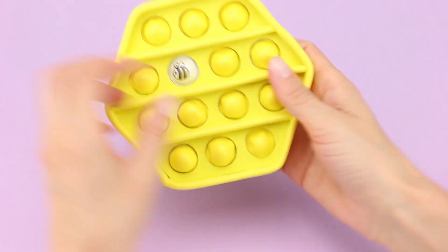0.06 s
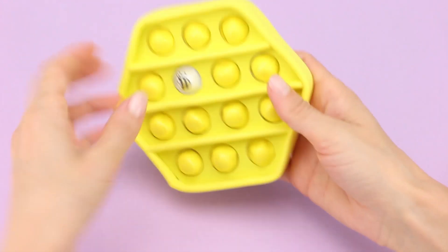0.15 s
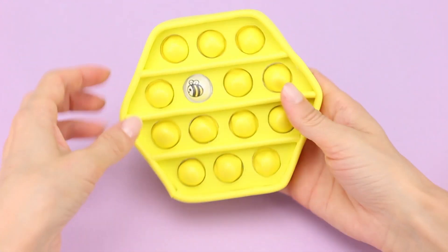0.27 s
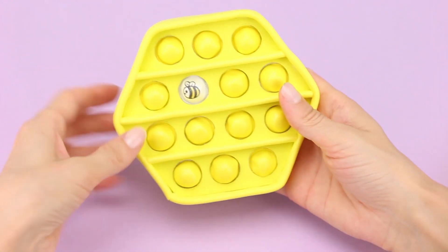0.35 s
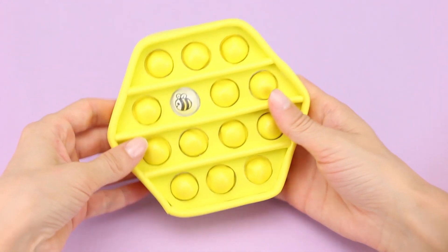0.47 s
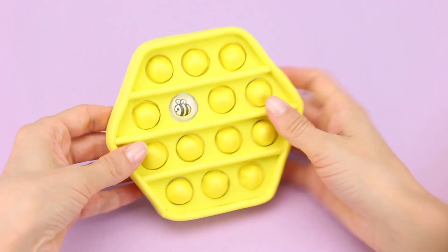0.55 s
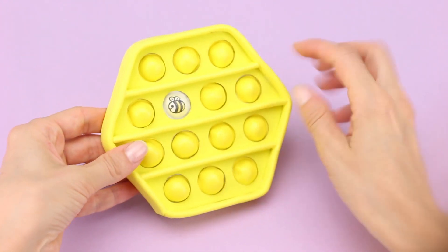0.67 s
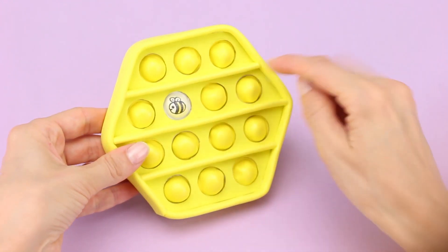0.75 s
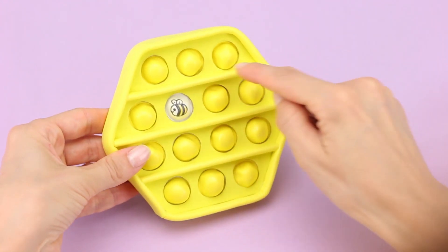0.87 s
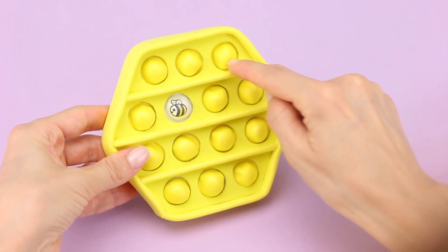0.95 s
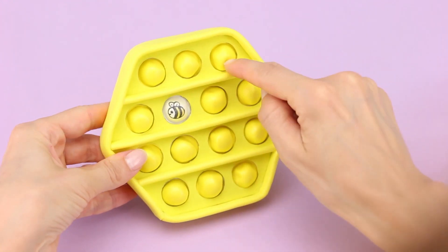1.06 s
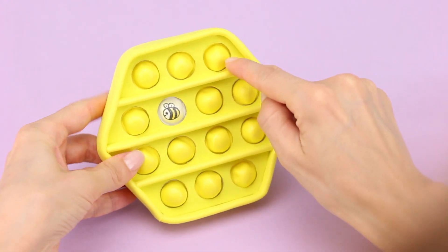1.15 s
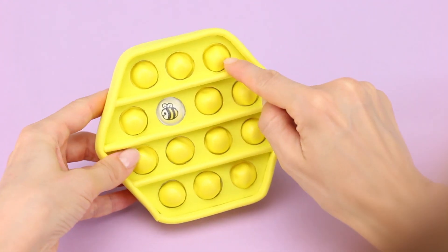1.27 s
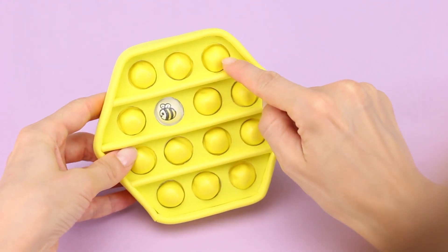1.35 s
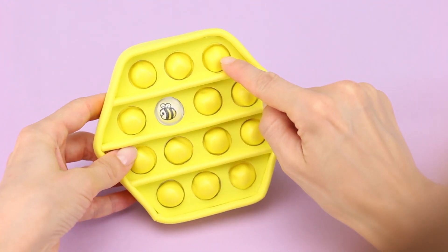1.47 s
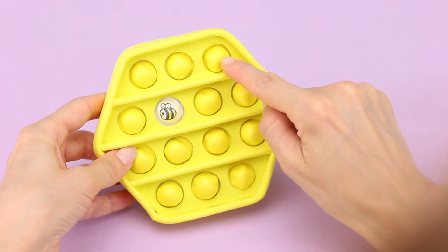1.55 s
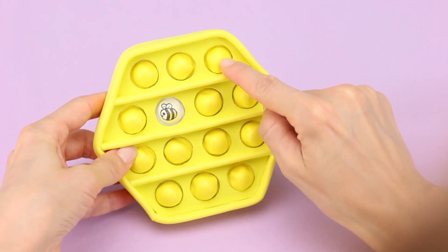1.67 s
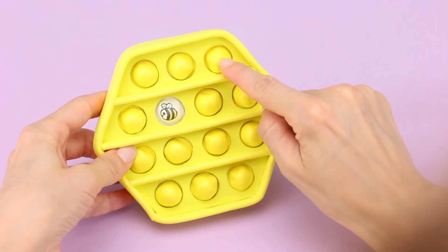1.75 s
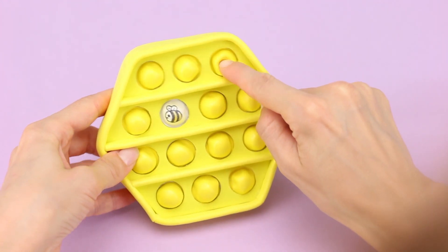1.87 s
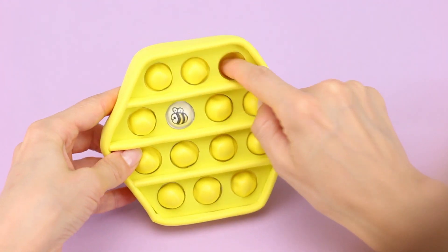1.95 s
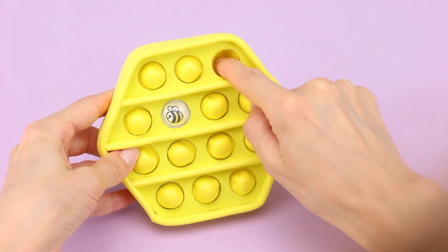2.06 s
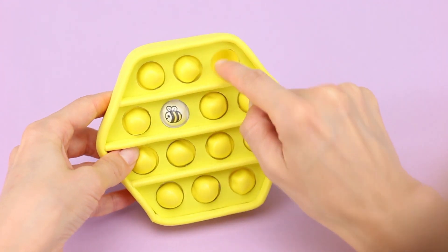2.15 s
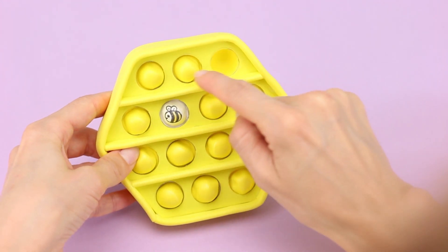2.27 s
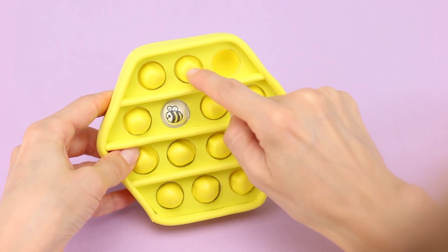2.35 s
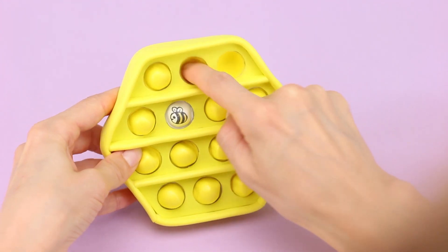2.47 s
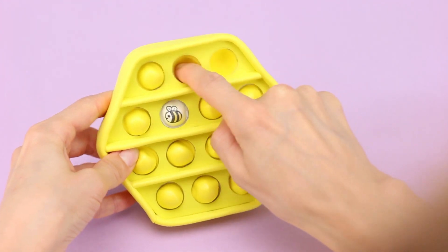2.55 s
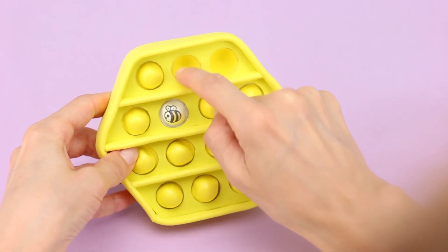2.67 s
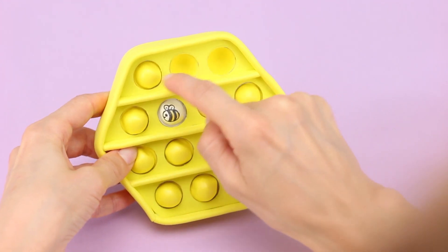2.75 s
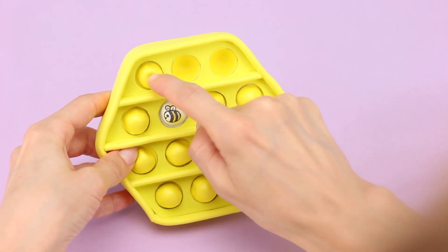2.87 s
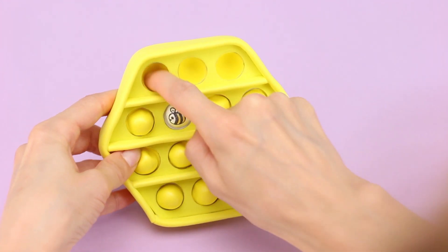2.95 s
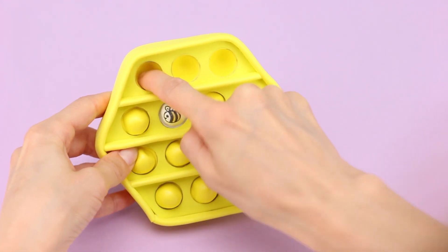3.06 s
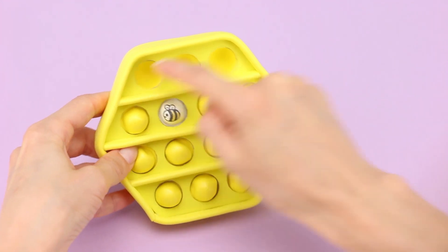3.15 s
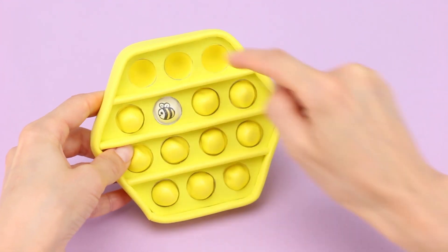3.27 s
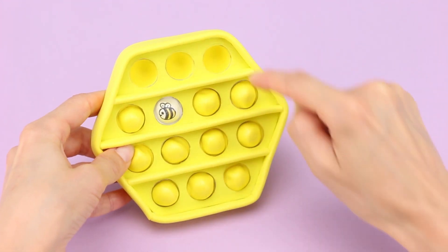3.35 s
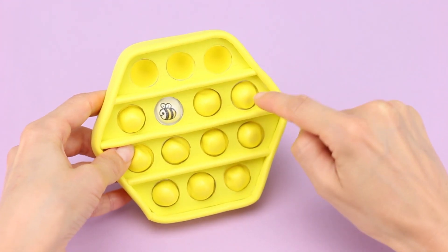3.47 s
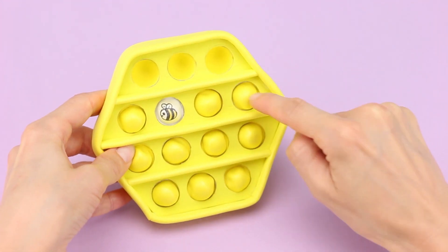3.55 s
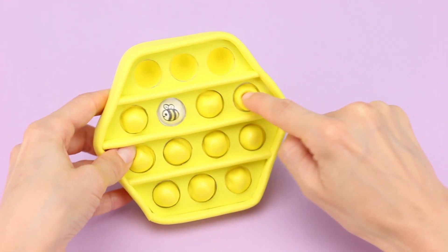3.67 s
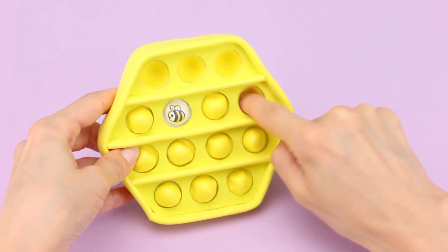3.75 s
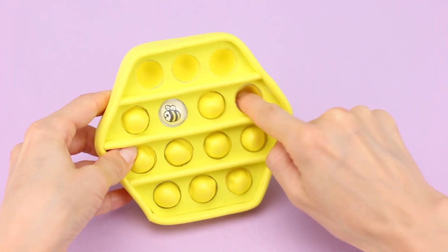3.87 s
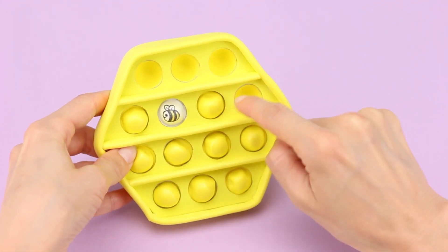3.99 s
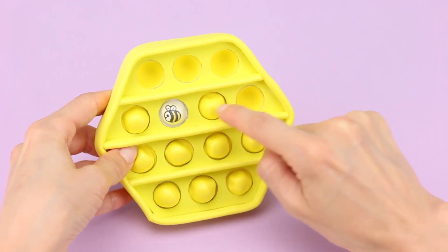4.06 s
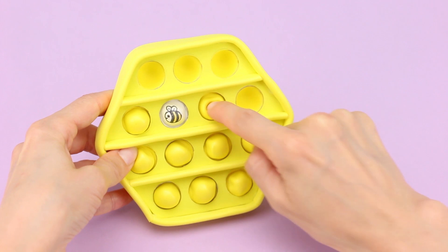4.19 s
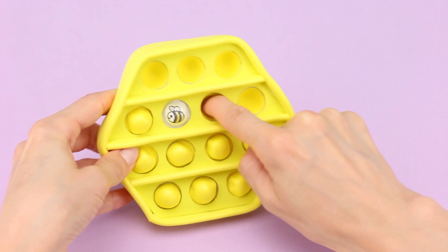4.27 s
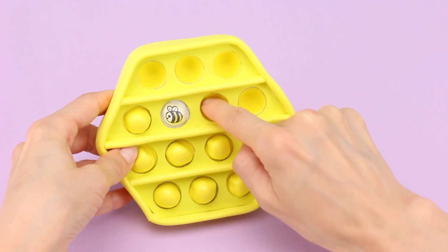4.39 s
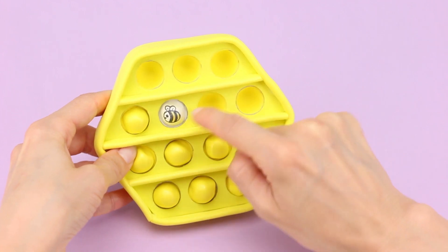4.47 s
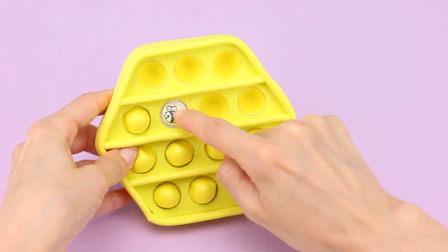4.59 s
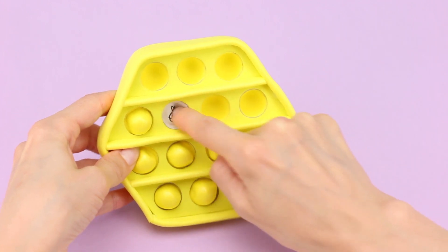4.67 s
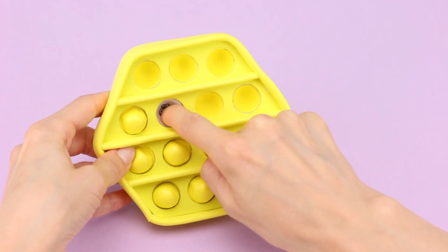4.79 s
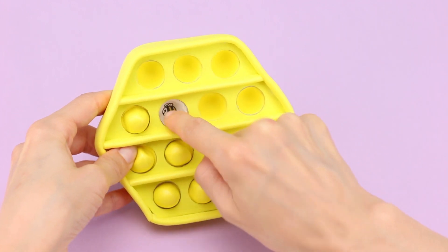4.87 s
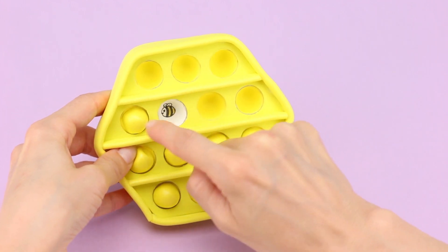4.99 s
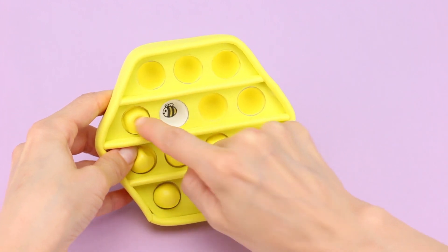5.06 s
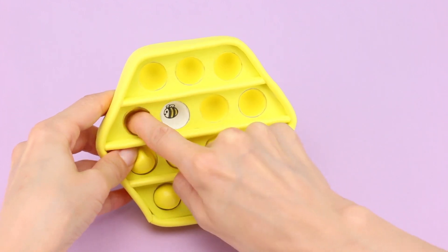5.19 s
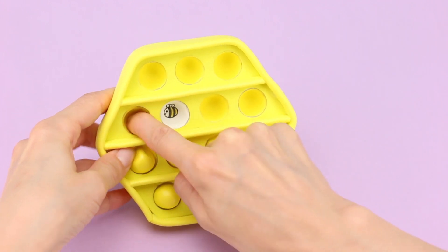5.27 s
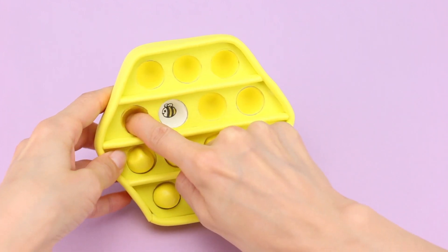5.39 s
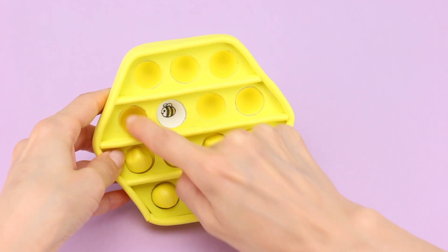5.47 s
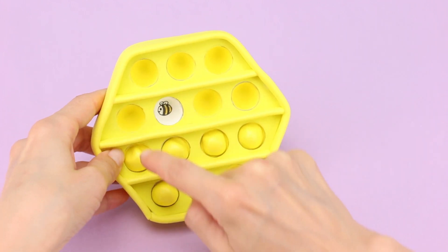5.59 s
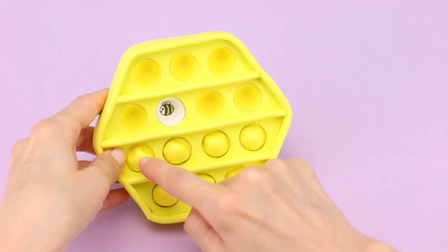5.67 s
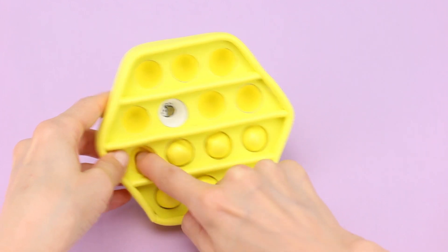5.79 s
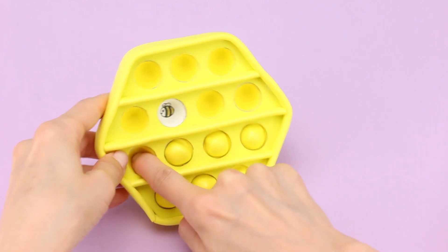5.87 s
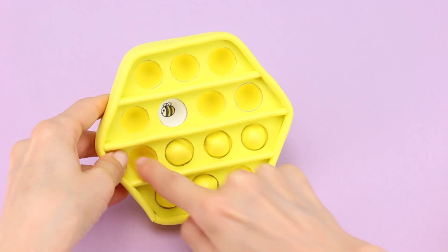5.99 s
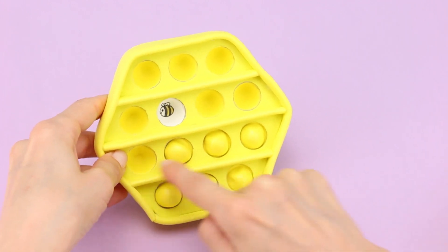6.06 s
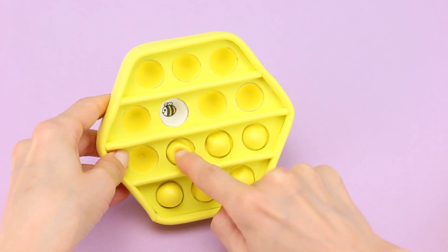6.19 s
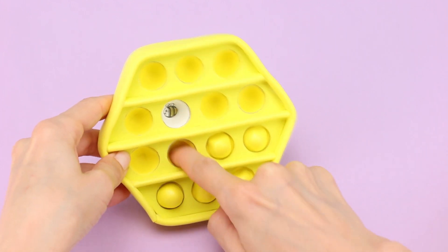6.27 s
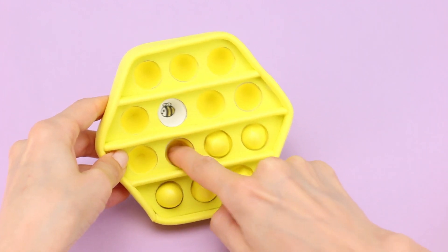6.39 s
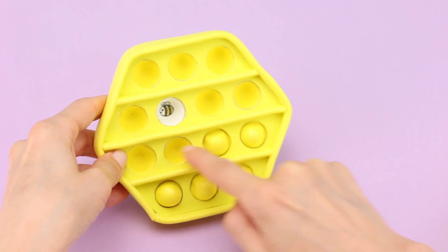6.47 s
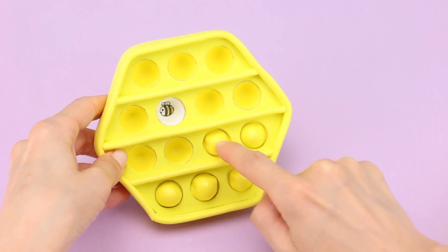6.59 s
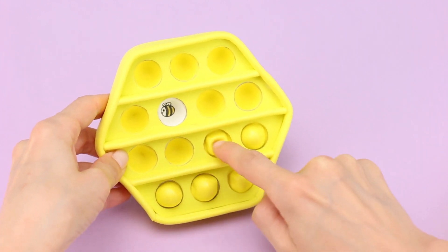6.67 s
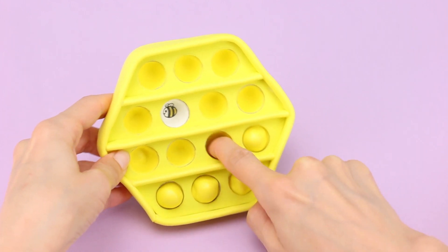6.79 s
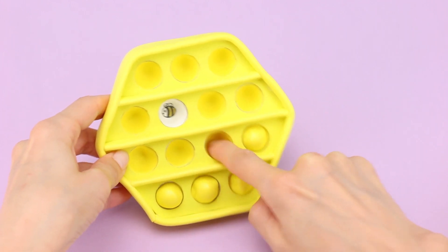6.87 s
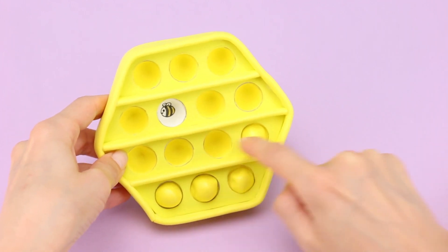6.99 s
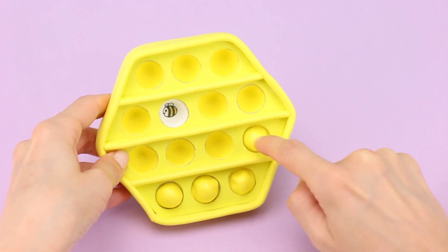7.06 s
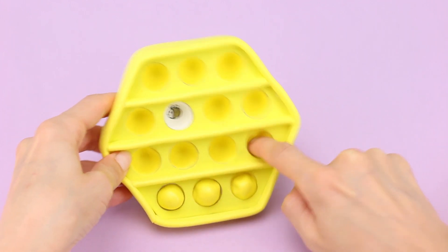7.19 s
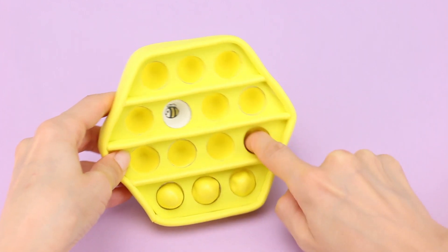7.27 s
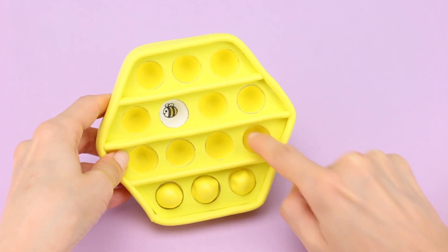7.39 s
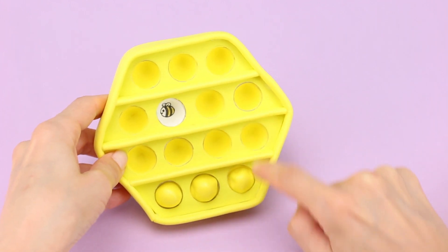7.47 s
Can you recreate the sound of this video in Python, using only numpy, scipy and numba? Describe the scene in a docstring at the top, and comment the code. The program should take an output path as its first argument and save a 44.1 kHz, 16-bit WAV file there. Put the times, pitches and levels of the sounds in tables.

```python
"""Fingertips first tap and rub softly on rubber over a faint hiss; from about two seconds, ten loud pops follow.
Fingers press the bubbles of a silicone pop toy, close to a stereo microphone in a small, bare room.
Each dome crumples, snaps through and rings the air in its cup; one stiff dome only crunches.
Taps, rubs and lifting fingers are noise shaped by resonances; the room adds reflections and a fading tail.
The loud pops overdrive the recorder: it clips their first cycles and its limiter ducks the start of the echo."""
import sys
import numpy as np
from scipy import signal
from scipy.fft import rfft, irfft, next_fast_len
from scipy.io import wavfile
from scipy.ndimage import map_coordinates
from numba import njit

SR = 44100
rng = np.random.default_rng(int(sys.argv[2]) if len(sys.argv) > 2 else 0)


def unload_wav(signal):
    """Save mono or channel-first audio to the path in sys.argv[1] as 16-bit WAV at rate SR, clipped to [-1, 1]."""
    wavfile.write(
        sys.argv[1],
        SR,
        np.round(np.clip(np.atleast_2d(signal).T, -1, 1) * 32767).astype(np.int16),
    )


N = 332073  # length of the scene in samples

# rings of the empty cups and of the whole sheet of rubber
CUPS_HZ, CUPS_WIDTH_HZ, SHEET_HZ, SHEET_WIDTH_HZ = 1437, 360, 154.5, 76

# one press per dome; the peak is that of the direct sound, before the room and the left-right balance:
# (time [s], peak [dB], cup pitch [Hz], dome pitch [Hz], dome against cup [dB], slap against cup [dB],
#  thump against cup [dB], snap speed as cut-off [Hz], hollowness [0-1], puff peak [dB], time until the lift [s])
DOME_POPS = [(2.0335, 7, 1220, 2394, 0, -26, -7.5, 5800, 0.4, -26, 0.15),
             (2.544, 10, 1420, 1960, -4.5, -22.5, -12, 5300, 0.03, -47.5, .167),
             (3.0317, 2.5, 1150, 1860, -6, -13, -3.5, 4720, .2, -50.5, .165),
             (3.8342, -7.5, 920, 2670, -41, -43, 3, 4000, 0.4, -46, .153),
             (4.3343, 8.5, 1484, 2450, -18.5, -16, -37, 3140, 0.2, -18.5, .145),
             (5.2246, 10, 1360, 2230, -15, -14.5, -51, 4500, 0.63, -7, .32),
             (5.892, -0.5, 1220, 2950, -30, -51, -40, 7220, 0.44, -57, .185),
             (6.3501, 8, 1520, 2740, -47, -8.5, -35, 3800, 0.3, -7.5, .153),
             (6.831, 13, 1584, 2555, -16, -34.5, -36, 7600, 0.84, -44, .174),
             (7.295, 8, 1483, 2575, -24, -19.5, -14.5, 4630, 0.7, -15, .174)]
# a dome that catches halfway snaps a first time just before its pop:
# (time [s], peak of the direct sound [dB])
HALFWAY_CATCHES = [(2.5396, 3.5), (3.0243, -12)]


def pops(puff_s=0.00039):
    """Each dome snaps through and displaces one low puff, heard only up close; a catch has the voice of its dome."""
    track = np.zeros((2, N))
    t = np.arange(SR // 10) / SR
    for s, db, *voice, puff_db, _ in DOME_POPS:
        add(track, s, snap(db, *voice))
        puff = -amp(puff_db) * t / puff_s * np.exp(1 - t / puff_s)
        add(track, s, puff[None])  # straight to the microphone, without the room
    for s, db in HALFWAY_CATCHES:
        nearest_pop = min(DOME_POPS, key=lambda pop: abs(pop[0] - s))
        _, _, *voice, _, _ = nearest_pop
        add(track, s, snap(db, *voice))
    return track


# width of the cup's ring over its pitch; a fully hollow pop has this much less
CUP_DAMPING, HOLLOW_RINGS = 0.58, 0.22
GAP_RATIO = 0.839  # the hollow lies just under the dome's own pitch


def snap(db, cup_hz, dome_hz, dome_db, slap_db, thump_db, snap_hz, hollow,
         slap_hz=4800, slap_width=2000, dome_width=540, overtone=1.136,
         thump_hz=236, thump_width=50, flap_db=-7, radiates_hz=350,
         gap_width=340, upper_gap=1.8, upper_gap_width=750):
    """One sudden push of air rings the cup, two modes of the dome's skin and the floppy sheet, for a few cycles."""
    f = np.fft.rfftfreq(4096, 1 / SR)
    cup_damping = max(CUP_DAMPING - HOLLOW_RINGS * hollow, .1)
    cup = resonance(f, cup_hz, cup_damping * cup_hz)
    cup = cup * 1j * f / (1j * f + radiates_hz)  # so small a cup radiates little bass
    two_modes = resonance(f, dome_hz, dome_width) + resonance(f, overtone * dome_hz, dome_width)
    dome = amp(dome_db) * two_modes
    slap = amp(slap_db) * resonance(f, slap_hz, slap_width)
    flap = amp(flap_db) * resonance(f, SHEET_HZ, SHEET_WIDTH_HZ)
    sheet = amp(thump_db) * (flap - resonance(f, thump_hz, thump_width))
    # between the modes, parts of the dome move against each other and cancel: two gaps make the pop hollow
    gap_hz = GAP_RATIO * dome_hz
    lower = 1 - hollow * resonance(f, gap_hz, gap_width)
    upper = 1 - hollow * resonance(f, upper_gap * gap_hz, upper_gap_width)
    voice = (cup + dome + slap + sheet) * lower * upper * lowpass(f, snap_hz, order=6)
    # the dome flips away from the microphone, so suction comes before the push
    pop = -irfft(voice)
    return in_room(amp(db) * pop / np.abs(pop).max(), wet_db=-3.0)


def buckling(level_db=-42, rise_t60=0.032, rush_db=19, rush_t60=0.005, hz=1300, width=3200):
    """Before each pop the dome crumples ever louder, with a last rush as it gives way."""
    track = np.zeros((2, N))
    before = np.arange(SR // 20)[::-1] / SR  # seconds left until the pop
    colour = lambda f: resonance(f, hz, width) * lowpass(f, 7700, order=2)
    for s, db, *_ in DOME_POPS:
        creak = unit(filtered(rng.standard_normal(len(before)), colour))
        swell = amp(-60 * before / rise_t60) + amp(rush_db - 60 * before / rush_t60)
        # louder pops crumple louder, by half as many dB
        add(track, s - before[0], in_room(amp(level_db + db / 2) * creak * swell, wet_db=-0.5))
    return track


# one dome has a stiff cap and only crunches when pressed: time [s], level [dB], time until the lift [s]
CAP_S, CAP_DB, CAP_HOLD_S = 4.7825, -30, .168
# resonances of the stiff cap: (pitch [Hz], width [Hz], level against each other [dB])
STIFF_CAP_MODES = [(330, 210, 7), (854, 156, -8.5), (1283, 300, -1.5), (3015, 8100, -13)]


def capped_dome(rise_t60=0.024, fall_t60=0.061, top_hz=10000):
    """The stiff cap scrapes down into its cup without a snap: friction rings its modes."""
    track = np.zeros((2, N))
    t = np.arange(-SR // 20, SR // 10) / SR
    modes = lambda f: sum(amp(db) * resonance(f, hz, width) for hz, width, db in STIFF_CAP_MODES)
    body = lambda f: modes(f) * lowpass(f, top_hz, order=2)
    swell = amp(CAP_DB - 60 * np.maximum(-t / rise_t60, t / fall_t60))
    scrape = unit(filtered(friction(len(t)), body))
    add(track, CAP_S + t[0], in_room(scrape * swell, wet_db=-4))
    return track


# fingertips landing on the rubber; the peak is that of the direct sound:
# (time [s], peak [dB], thud pitch [Hz], tick against thud [dB])
FINGER_TAPS = [(0.062, -36.5, 980, -11), (0.172, -36.5, 176, -1), (0.667, -39, 1933, -27),
               (2.003, -40.5, 146, -0.5), (2.935, -53, 222, -11), (3.808, -31.5, 499, 9),
               (4.2109, -40, 409, -0.5), (4.7463, -35, 480, 0), (5.15, -45, 352, 1.5),
               (5.805, -43, 1404, -13.5), (6.256, -48.5, 1305, -4), (6.712, -43, 1880, -18)]


def taps(contact_t60=0.03, tick_hz=2800, tick_width=5000, damping=.9):
    """A fingertip lands: a short scuff into a heavily damped thud, with a tick of skin."""
    track = np.zeros((2, N))
    t = np.arange(SR // 10) / SR
    tick_colour = lambda f: resonance(f, tick_hz, tick_width) * lowpass(f, 9000, order=2)
    for s, db, thud_hz, tick_db in FINGER_TAPS:
        force = rng.standard_normal(len(t)) * amp(-60 * t / contact_t60)
        thud = unit(filtered(force, lambda f: resonance(f, thud_hz, damping * thud_hz) ** 2))
        tick = unit(filtered(force, tick_colour))
        tap = thud + amp(tick_db) * tick
        add(track, s, in_room(amp(db) * tap / np.abs(tap).max(), wet_db=-1.5))
    return track


# skin sliding on silicone as the hands shift, and last a brief hiss of skin within the dull press at 3.83 s;
# the level is that before the swell and the room: (time of the middle [s], length [s], level [dB], skin pitch
# [Hz], cup ring against skin [dB], sheet rumble against skin [dB])
SKIN_RUBS = [(0.036, 0.22, -50.5, 2600, 2, -17), (0.48, 0.037, -57.5, 1700, -4, -4),
             (0.525, 0.05, -52, 2300, -10, 4), (0.658, 0.18, -55, 2290, -8, 5.5),
             (0.684, 0.27, -59.5, 7060, -12, -14), (1.014, 0.041, -58, 2840, -5, 12),
             (1.217, 0.16, -57, 3100, -18, -2), (1.437, 0.049, -57, 3080, -19, -9),
             (1.698, 0.077, -63, 2970, -21, -6), (2.43, 0.18, -51.5, 2900, -9, -1.5),
             (3.296, 0.13, -56.5, 2400, -2, -6), (3.83, 0.032, -47.5, 4450, -2.5, 9)]


def rubs(damping=1.23):
    """The hands shift their grip, and skin grinds in one dull press: skin hisses, the empty cups ring and the
    sheet rumbles."""
    track = np.zeros((2, N))
    for s, length, db, hz, cups_db, sheet_db in SKIN_RUBS:
        colour = lambda f: (resonance(f, hz, damping * hz) ** 2
                            + amp(cups_db) * resonance(f, CUPS_HZ, CUPS_WIDTH_HZ)
                            + amp(sheet_db) * resonance(f, SHEET_HZ, SHEET_WIDTH_HZ))
        add(track, s - length / 2, stroke(length, db, colour))
    return track


# the finger peels off after each press, louder the later it comes; LIFT_DB is the level at time 0
LIFT_DB, LIFT_GROWS_DB_PER_S, LIFT_HZ, LIFT_S = -64, 1.64, 5000, .038


def lifts(width_hz=7500, top_hz=11000):
    """After every press the fingertip peels out of the cup with a short bright scuff."""
    track = np.zeros((2, N))
    colour = lambda f: resonance(f, LIFT_HZ, width_hz) * lowpass(f, top_hz, order=2)
    times = [s + hold for s, *_, hold in DOME_POPS] + [CAP_S + CAP_HOLD_S]
    for s in times:
        level_db = LIFT_DB + LIFT_GROWS_DB_PER_S * s
        add(track, s - LIFT_S / 2, stroke(LIFT_S, level_db, colour))
    return track


def stroke(length, db, response):
    """One slide of skin that swells and fades, coloured by what it rubs."""
    size = int(length * SR)
    rub = unit(filtered(friction(size), response))
    return in_room(amp(db) * rub * np.hanning(size), wet_db=2.5)


def friction(size, slips_per_s=1500, smooth=0.93, catches_per_s=70, uneven_db=3.5):
    """Skin sticks and slips in tiny grains, catching unevenly on the rubber."""
    slips = rng.standard_normal(size) * (rng.random(size) < slips_per_s / SR)
    steps = np.arange(size) * catches_per_s / SR
    grip = map_coordinates(rng.standard_normal(100), [steps], mode="mirror")
    return (unit(slips) + smooth * rng.standard_normal(size)) * amp(uneven_db * grip)


# how long the echo takes to fade by 60 dB: (pitch [Hz], time [s])
ECHO_FADE = [(100, 0.31), (260, 0.46), (700, 0.26), (1600, 0.47), (4000, 0.43), (8000, 0.41), (14000, 0.24)]
# colour of the echo: (pitch [Hz], relative level [dB])
ECHO_COLOUR = [(60, 3.5), (140, 1), (270, -5.5), (520, 4.5), (660, -1.5), (860, 3), (1010, -4), (1200, 2),
               (1420, 0), (1700, -1.5), (3200, -4), (3800, -2), (5000, -5.5), (14000, -0.5)]
# how alike the echo is at left and right: (pitch [Hz], likeness [-1 to 1])
ECHO_ALIKE = [(100, 0.94), (700, 0.89), (1400, 0.75), (3000, .66), (7000, 0.15), (15000, 0.18)]
# standing waves: (pitch [Hz], level against the diffuse tail [dB], time to fade by 60 dB [s])
STANDING_WAVES = [(46.4, -25.5, .9), (144.5, -18, 0.32), (230.8, -26, 0.26), (333, -30.5, 0.47),
                  (435, -29.5, .4), (824, -33.5, 0.37), (852, -31, 0.16), (1188, -29, 0.25),
                  (1440, -35, 0.71), (1520, -25.5, 0.42), (1694, -19.5, 0.16)]
# first reflections, each delay varied slightly at random: (delay [s], gain [against the direct sound])
FIRST_REFLECTIONS = [(.0063, 0.29), (.0098, .13), (0.0122, 0.16), (0.0195, .12), (0.021, .13)]


def in_room(sound, wet_db, build_s=0.00043):
    """Direct sound, first reflections, a diffuse tail and standing waves; the tail differs as the hands move."""
    size = SR * 2 // 3
    t = np.arange(size) / SR
    noise = stereo_noise(size, ECHO_COLOUR, ECHO_ALIKE)
    hz, frames, z = signal.stft(noise, SR, nperseg=256)
    fade = amp(-60 * frames / along(ECHO_FADE, hz)[:, None])  # each pitch fades at its own rate
    tail = signal.istft(z * fade, SR, nperseg=256)[1][:, :size]
    tail = unit(tail * (1 - np.exp(-t / build_s)))
    for mode_hz, db, t60 in STANDING_WAVES:
        wave = np.sin(2 * np.pi * mode_hz * t) * amp(-60 * t / t60)
        tail = tail + amp(db) * unit(wave)
    echo = amp(wet_db) * tail / np.sqrt(size)
    for delay, gain in FIRST_REFLECTIONS:
        # one shift for both sides, then a tinier one for each
        arrival = delay + rng.normal(0, .00015) + rng.normal(0, .00003, 2)
        echo[[0, 1], np.round(arrival * SR).astype(int)] += gain
    echo[:, 0] += 1  # the direct sound
    return signal.fftconvolve(sound[None], echo, axes=1)


# colour of the steady hiss: (pitch [Hz], relative level per Hz [dB])
HISS_COLOUR = [(15, -48.5), (25, -16.5), (84, 0.5), (242, 0.5), (317, -0.5), (384, 0.5), (463, -0.5),
               (1370, -6), (2410, -7), (4870, -12.5), (10100, -15.5), (14400, -19), (16000, -27.5)]
# how alike the hiss is at left and right, below 0 for opposite: (pitch [Hz], likeness [-1 to 1])
HISS_LIKENESS = [(60, -0.58), (240, -0.61), (950, -0.59), (3770, -0.23), (15000, -0.39)]


def hiss():
    """A steady faint hiss: coloured noise, partly opposite at left and right."""
    return amp(-53.5) * stereo_noise(N, HISS_COLOUR, HISS_LIKENESS)


def stereo_noise(size, spectrum, alike):
    """Coloured noise of rms 1, partly shared by left and right."""
    # the likeness sets how much goes to the shared middle and how much to the opposed sides
    turn = lambda f: np.arccos(np.clip(along(alike, f), -1, 1)) / 2
    colour = lambda f: amp(along(spectrum, f)) * np.array([np.cos(turn(f)), np.sin(turn(f))])
    mid, side = filtered(rng.standard_normal((2, size)), colour)
    return unit(np.array([mid + side, mid - side]))


def amp(db):
    """Decibels to gain."""
    return 10 ** (np.asarray(db) / 20)


def unit(x):
    """x at rms 1."""
    return x / np.sqrt(np.mean(x ** 2) + 1e-20)


def along(points, hz):
    """(Hz, value) points read on a log axis."""
    f, v = np.transpose(points)
    return np.interp(np.log(hz + 1), np.log(f), v)


def filtered(x, response):
    """x times a complex response of frequency."""
    size = x.shape[-1]
    m = next_fast_len(size + 8192)
    return irfft(rfft(x, m) * response(np.fft.rfftfreq(m, 1 / SR)), m)[..., :size]


def resonance(f, hz, width):
    """Causal response of one damped mode."""
    return 1j * f * width / (hz * hz - f * f + 1j * f * width)


def lowpass(f, hz, order):
    """Causal response of a smooth low-pass."""
    return signal.freqs(*signal.butter(order, hz, analog=True), f)[1]


def add(track, s, sound):
    """Mix a sound into a stereo track from time s on."""
    start = round(s * SR)
    sound = sound[:, max(-start, 0):N - start]
    track[:, max(start, 0):][:, :sound.shape[1]] += sound


def scene():
    """The toy sits a little to the left, over a steady faint hiss."""
    toy = pops() + buckling() + capped_dome() + taps() + rubs() + lifts()
    left_right_db = [[.75], [-.75]]
    return toy * amp(left_right_db) + hiss()


@njit
def follow(need, attack, release):
    """Track a level, rising fast and falling slowly (times in samples)."""
    out, level = np.zeros(len(need)), 0.0
    for i in range(len(need)):
        level += (need[i] - level) / (attack if need[i] > level else release)
        out[i] = level
    return out


TOP_HZ = 16200  # nothing passes above this
# the recorder's top end: (pitch [Hz], level [dB])
SOFT_TREBLE = [(7000, 0), (9500, -2.5), (15000, -3.5)]


def record(dry, threshold_db=-6, attack_s=0.00069, release_s=0.072):
    """A limiter too slow for the first cycles, rounded clipping at full scale, a soft top end, then the band limit."""
    loudest_side = np.abs(dry).max(axis=0)
    over_db = np.maximum(20 * np.log10(loudest_side + 1e-9) - threshold_db, 0)
    ducked = dry * amp(-follow(over_db, attack_s * SR, release_s * SR))
    clipped = ducked / (1 + np.abs(ducked) ** 10) ** (1 / 10)
    return filtered(clipped, lambda f: amp(along(SOFT_TREBLE, f)) * (f < TOP_HZ))


dry = scene()
out = record(dry)
unload_wav(out)
```